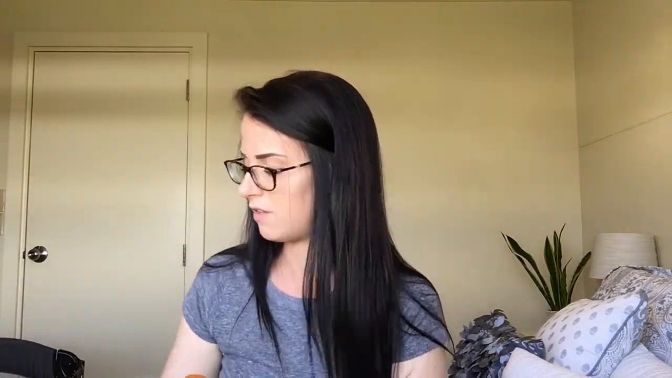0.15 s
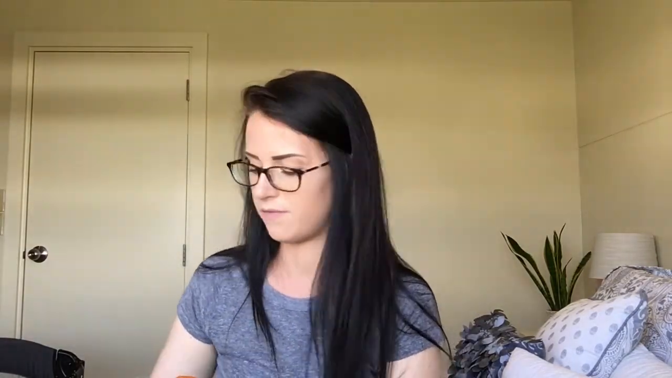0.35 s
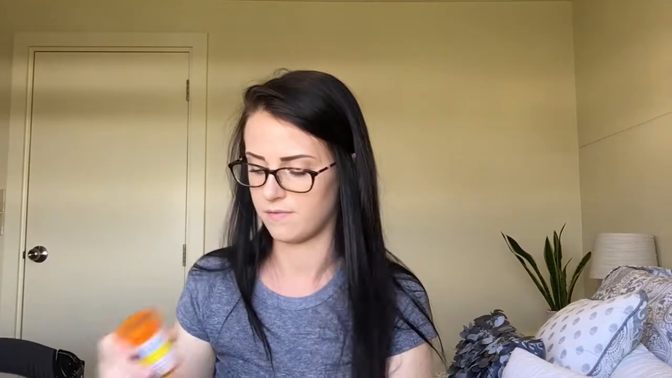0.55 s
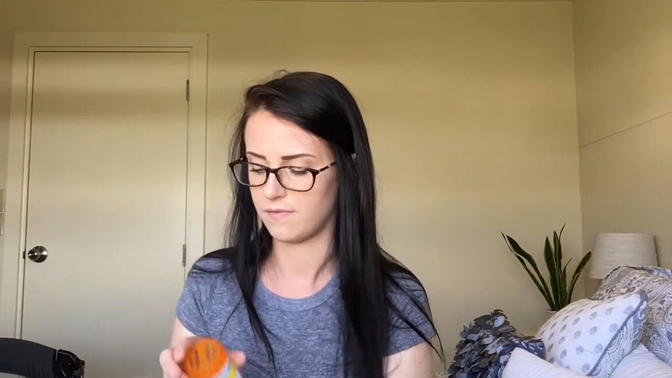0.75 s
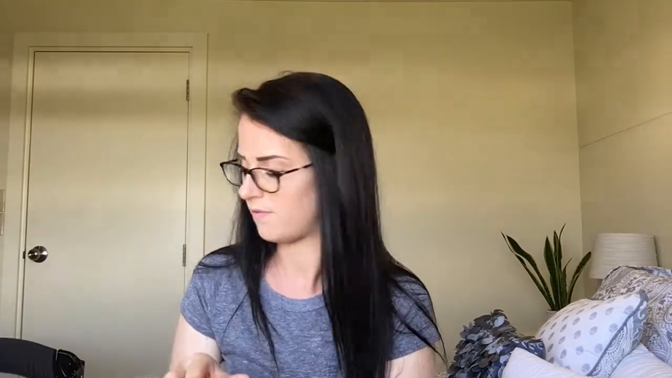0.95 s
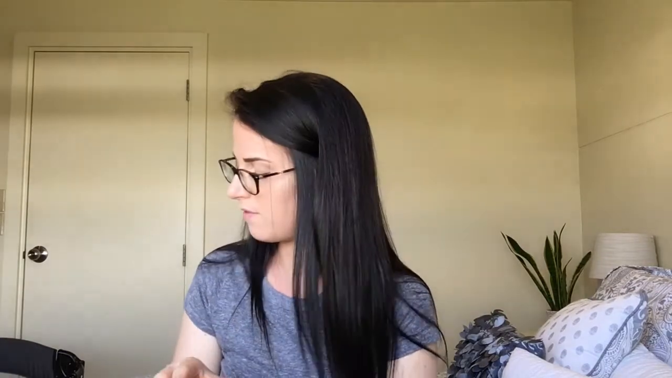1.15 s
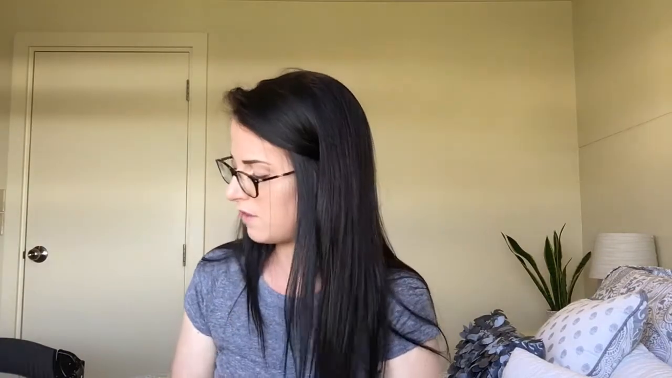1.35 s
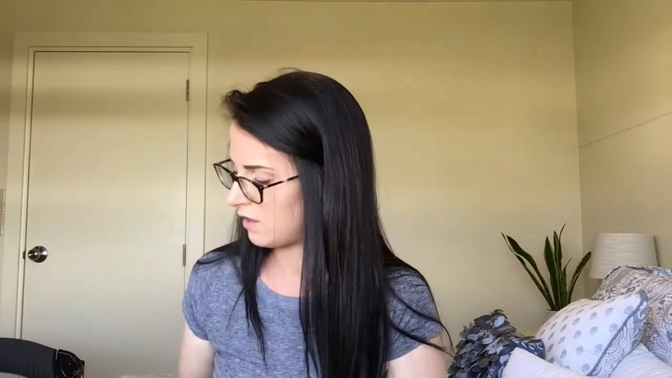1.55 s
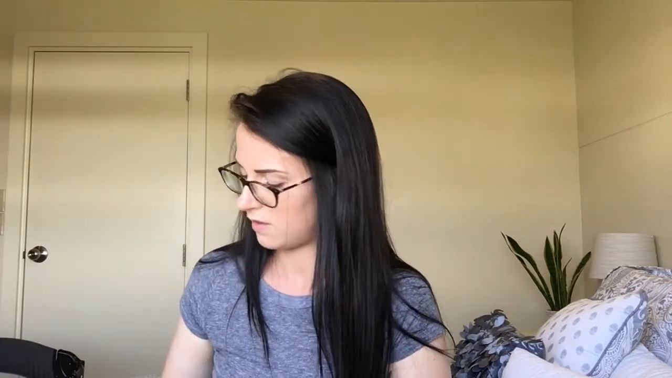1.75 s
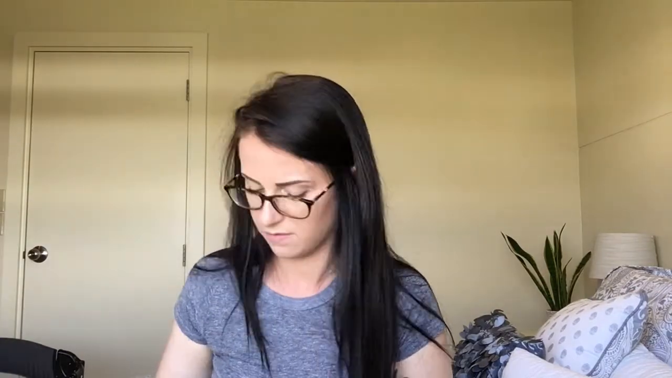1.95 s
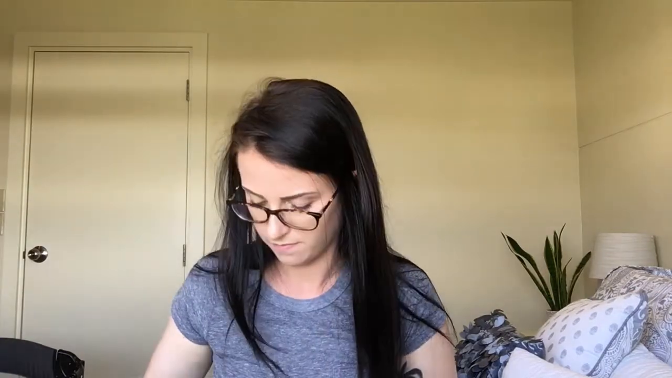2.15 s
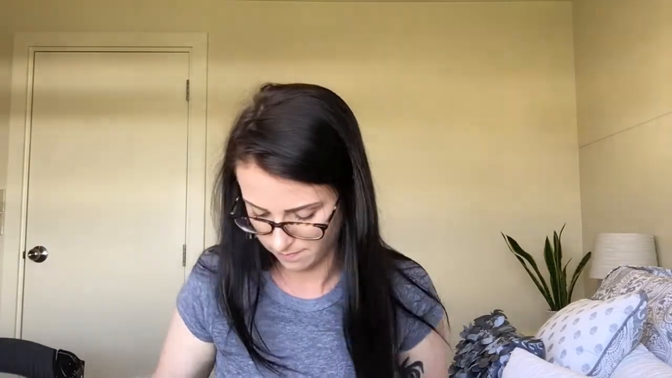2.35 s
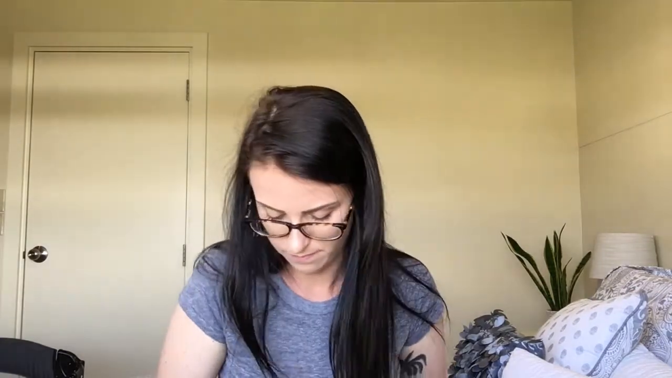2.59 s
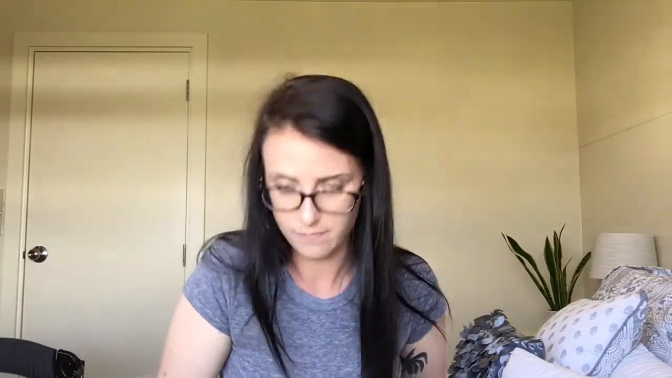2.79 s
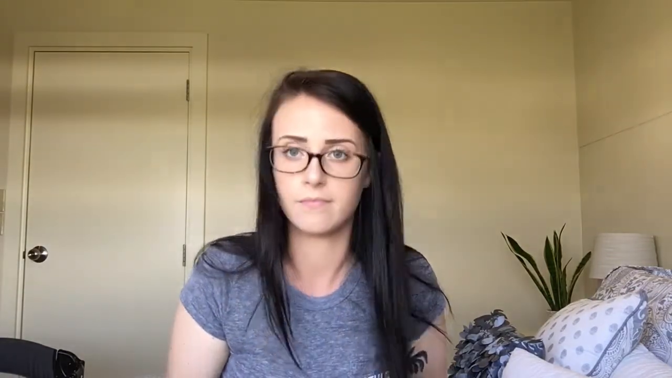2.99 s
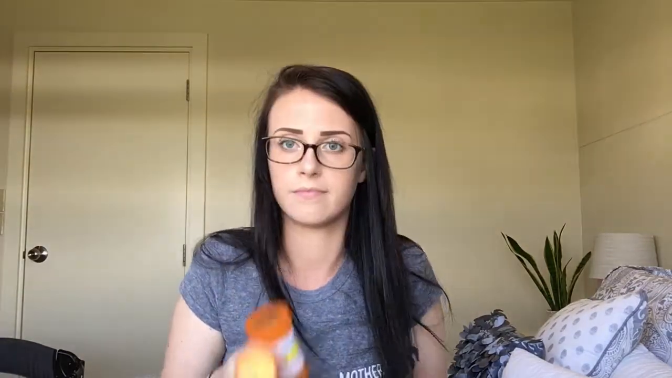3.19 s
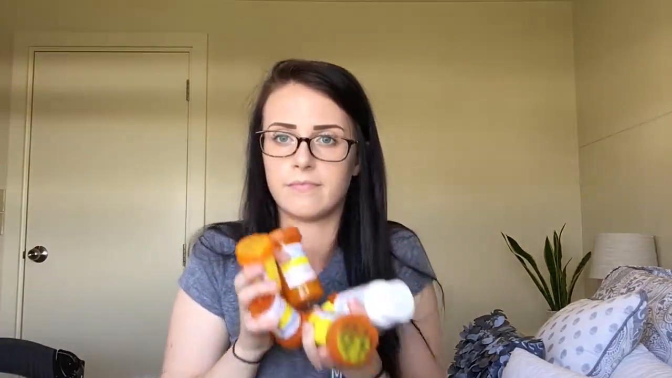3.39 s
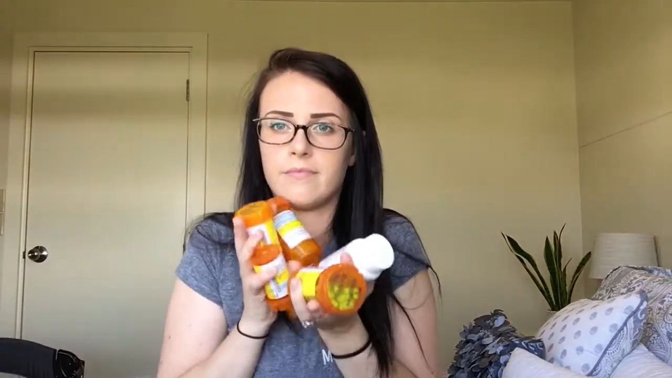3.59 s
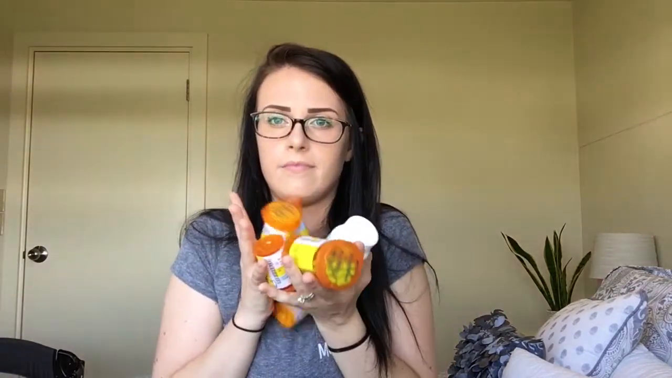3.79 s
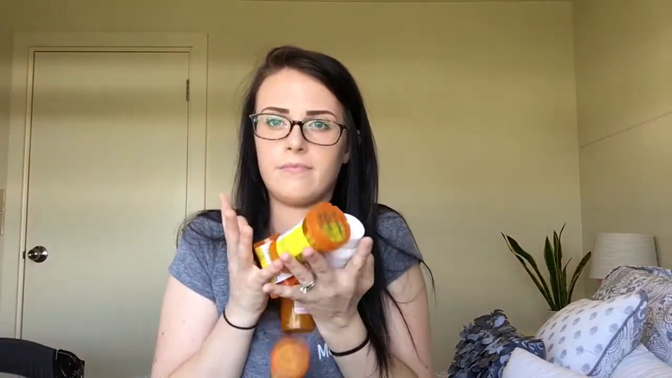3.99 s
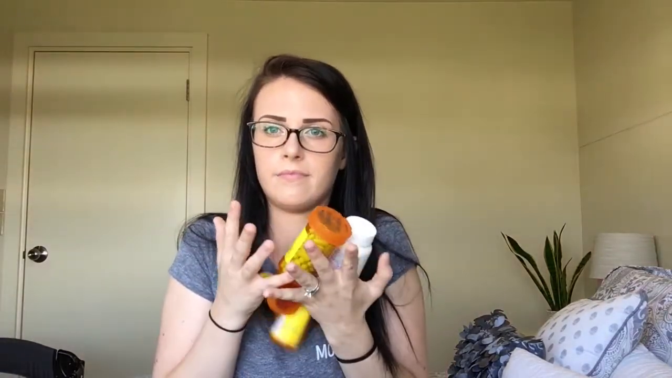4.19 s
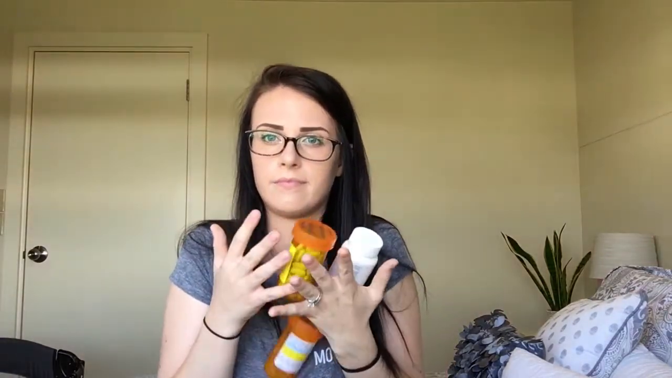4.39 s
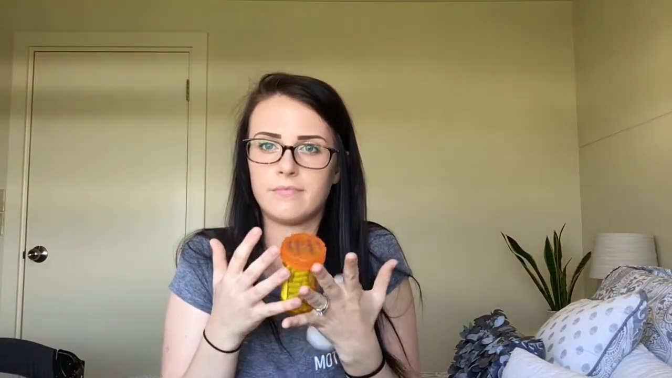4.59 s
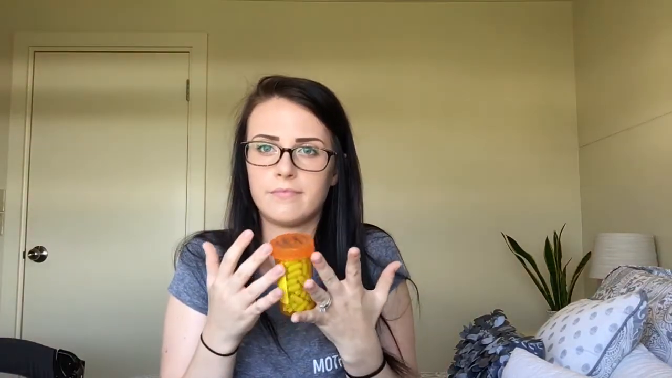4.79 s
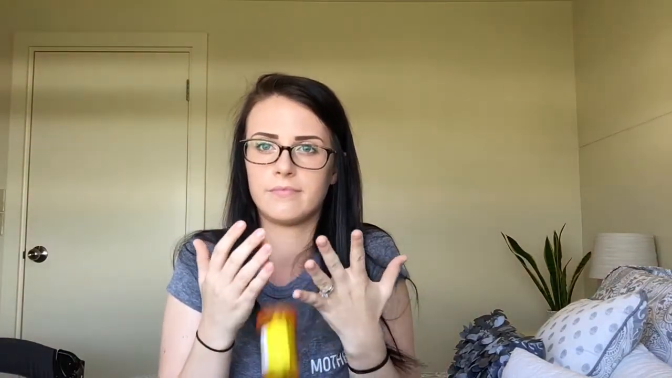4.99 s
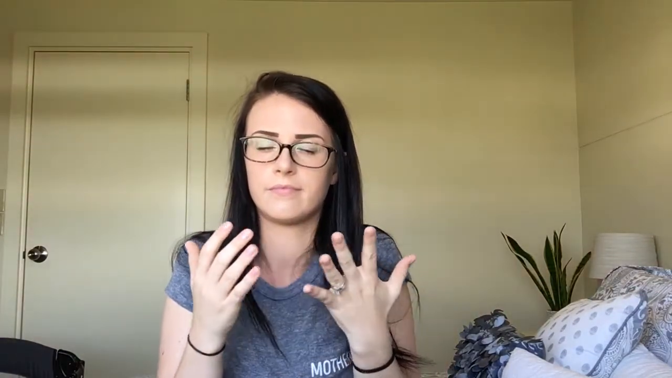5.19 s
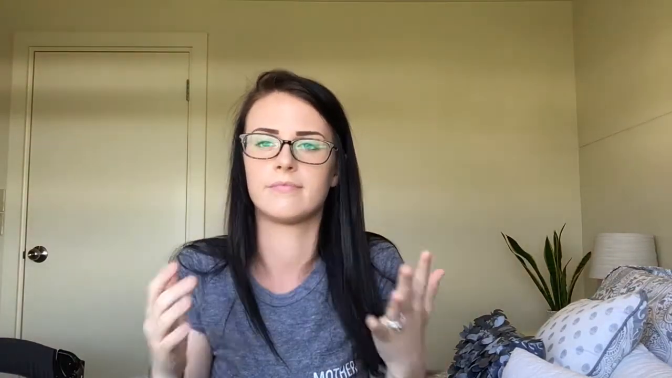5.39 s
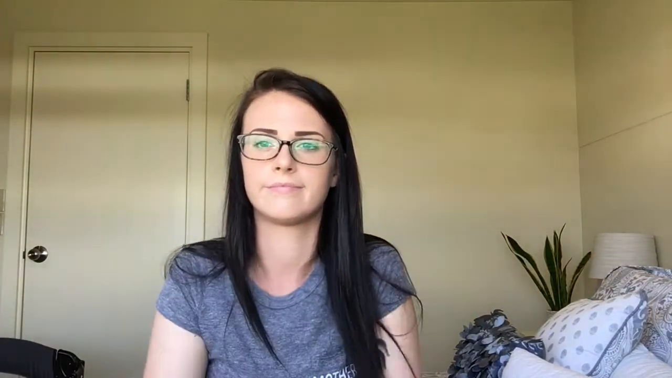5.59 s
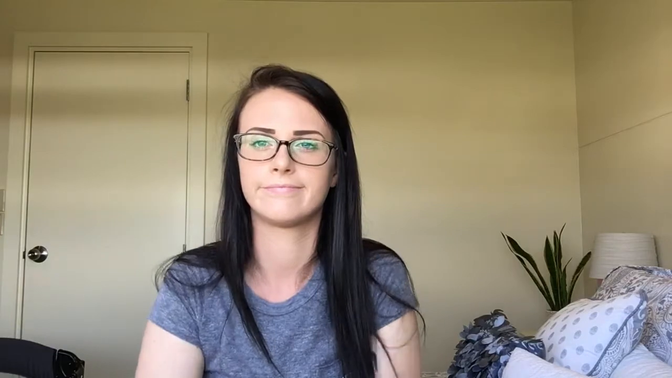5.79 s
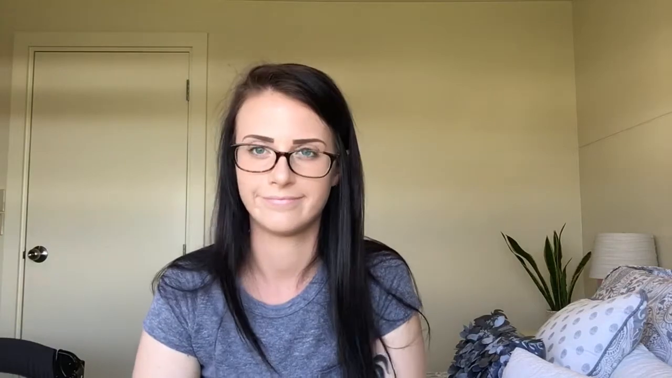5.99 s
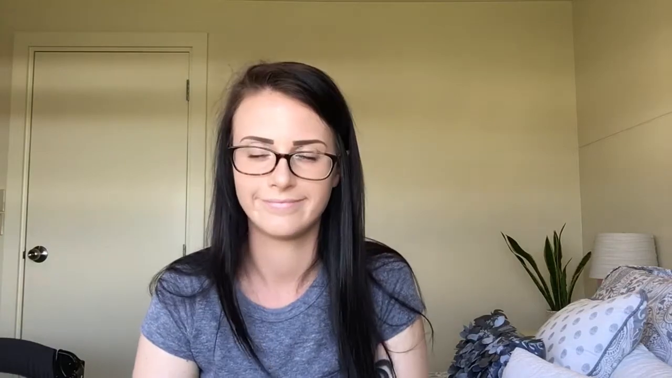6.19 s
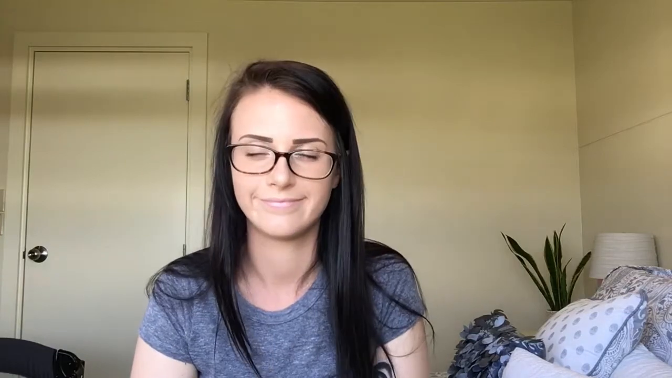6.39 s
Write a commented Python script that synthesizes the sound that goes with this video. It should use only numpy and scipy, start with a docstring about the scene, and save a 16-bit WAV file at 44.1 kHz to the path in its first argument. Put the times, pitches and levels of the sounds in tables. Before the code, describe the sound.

A small, quiet room with faint air noise and a weak low hum, heard fairly close. From 0.3 s, pill-filled plastic bottles are picked up: a light tick and soft bump, faint rubbing, then a small rattle near 0.9 s. Brisker dry rattles come at 1.2-1.3, 1.5-1.8 and, strongest of this group, around 2.0 s, with lesser ones at 2.4 and 2.6 s. It thins to almost nothing around 3 s. From 3.3 s several bottles are lifted and jostled with light clicks and rubbing. At 4.0 s they begin to fall: hollow knocks and pill bursts at 4.0, 4.3-4.4 and 4.55 s, a hard clack at 4.75 s, then the loudest sharp crack and clatter from 4.97 to 5.25 s. The pile settles quickly by 5.5 s. At about 5.8 s a soft low thud lands with a plastic knock and brief rattle, then a tiny tick and quiet.

```python
"""Pills clatter inside plastic bottles: each jolt is random contacts on ringing walls, their force rising and fading.
Caps and walls knock together as single hard blows, the hardest as the bottles fall on the pile.
The bottles are gathered from a table, jostled in two hands and let fall: gated ticking and rubbing.
Falling bottles and, at the end, the dropping hands land with soft thuds of low swings and dull noise.
A small quiet room adds dense reflections, under them filtered noise and a faint wavering hum."""
import sys
import numpy as np
from scipy import signal
from scipy.fft import rfft, irfft
from scipy.io import wavfile

SR = 44100
rng = np.random.default_rng(int(sys.argv[2]) if len(sys.argv) > 2 else 0)


def wrap_up_sound(samples):
    """Save the sound to the file named by the first command line argument, as 16-bit audio."""
    columns = np.atleast_2d(samples).T
    # keep every value between -1 and 1, then stretch to whole-number steps
    tamed = np.clip(columns, -1, 1)
    steps = np.round(tamed * 32767).astype(np.int16)
    wavfile.write(sys.argv[1], SR, steps)


N = 284400
TAPS = 4096
HZ = np.fft.rfftfreq(TAPS, 1 / SR)

# where a bottle is hit: name: (hollow ring [Hz], strength of that ring [dB])
HIT_SPOTS = {"palm": (757, 12), "large": (1158, 17.4), "pile": (1240, 7.63), "base": (1596, 19),
             "neck": (1800, 21), "wall": (1820, 7.3), "small": (2210, 7.5), "cap": (2660, 10.4),
             "lid": (2440, 19.6), "rim": (3600, 10), "edge": (5600, 4)}
# jolts of one bottle:
# (time [s], swell [s], fall [s], level at the crest [dB], brightness [dB per octave], spot)
JOLTS = [(0.279, 0.047, 0.11, -39.5, 3.5, "edge"), (0.375, .003, 0.031, -29.5, 3.5, "cap"),
         (0.838, 0.019, 0.008, -33.5, 0, "palm"), (0.913, 0.0012, 0.018, -31, -0.5, "small"),
         (1.214, 0.0026, 0.0093, -26, -4, "large"), (1.249, .022, 0.077, -33, -3.5, "large"),
         (1.313, 0.0053, 0.013, -23.5, -4, "pile"), (1.434, 0.044, 0.0054, -42.5, -5, "wall"),
         (1.527, 0.011, 0.021, -21, .3, "edge"), (1.656, 0.012, 0.022, -30.5, -1, "small"),
         (1.723, .038, 0.019, -27, 2, "small"), (1.802, 0.0034, 0.0091, -21, 0, "edge"),
         (2.006, 0.012, 0.013, -20, -2, "neck"), (2.043, 0.011, 0.017, -23, -2, "wall"),
         (2.399, 0.0036, 0.0047, -31, -3, "palm"), (2.581, .005, 0.011, -22, -1.5, "cap"),
         (2.602, 0.0067, 0.009, -24.5, -3.5, "cap"), (2.774, 0.0078, 0.018, -37, -3.5, "small"),
         (2.842, 0.0021, 0.02, -37.5, -4, "wall"), (3.356, 0.018, 0.0079, -32, -1.5, "rim"),
         (3.85, 0.027, 0.014, -29.5, -2.5, "wall"), (3.925, 0.018, 0.013, -23, -4, "edge"),
         (4.002, 0.0068, 0.037, -23.5, -4, "pile"), (4.281, .01, 0.008, -17.5, 3.5, "small"),
         (4.551, 0.012, 0.0076, -16, -1, "pile"), (4.657, .002, 0.026, -24, 0, "cap"),
         (4.738, 0.028, 0.011, -14, -3.5, "large"), (4.787, 0.01, 0.017, -30, 0.5, "large"),
         (4.969, .011, 0.0031, -9, -1.1, "wall"), (5.017, 0.0073, 0.012, -15.5, 0, "pile"),
         (5.12, 0.0086, 0.038, -29, -7, "large"), (5.176, 0.032, 0.014, -9, -1.8, "pile"),
         (5.218, 0.0028, 0.02, -11.5, -2.5, "wall"), (5.326, 0.012, 0.057, -30.5, -4, "rim"),
         (5.786, 0.028, 0.013, -30.5, -0.2, "pile")]


def rattles(spread_db=6.0, start_gain=0.41, end_db=-7, settle_s=0.051, detune_octaves=0.06,
            hardness_db_per_octave=1.0, pills=12, contacts_per_s=140):
    """A jolt throws the pills against the wall: contacts grow stronger to a crest, then weaken and settle."""
    out = np.zeros(N)
    t = np.arange(SR // 5) / SR
    for time_s, swell_s, fall_s, level_db, bright, spot in JOLTS:
        hollow_hz, hollow_db = HIT_SPOTS[spot]
        after_s = np.maximum(t - swell_s, 0)
        force = np.interp(t, [0, swell_s], [start_gain, 1])
        force *= amp(end_db * after_s / fall_s)
        force *= np.exp(-np.maximum(after_s - fall_s, 0) / settle_s)
        clatter = 0
        # each pill has its own place on the wall and lands flat (dull) or on edge (bright)
        for place, edge in rng.uniform(-1, 1, (pills, 2)):
            pill_hollow_hz = hollow_hz * 2 ** (detune_octaves * place)
            colour_db = bottle_colour(pill_hollow_hz, hollow_db, bright + hardness_db_per_octave * edge)
            hits = force * contacts(len(t), contacts_per_s, spread_db)
            clatter = clatter + signal.fftconvolve(hits, blow(colour_db))
        add(out, time_s, amp(level_db) * np.linalg.norm(force) * unit(clatter))
    return out


def contacts(length, per_s, spread_db):
    """Random contacts of uneven strength and either sign, with a mean power of one."""
    size = amp(spread_db * np.clip(rng.standard_normal(length), -2, 2))
    size *= rng.choice([-1, 1], length)
    happens = rng.random(length) < per_s / SR
    return unit(size * happens) * np.sqrt(length)


def blow(colour_db, scatter=2.42, scatter_s=0.0013):
    """A sharp tick, then a millisecond of waves crossing the bottle, drawn once per pill, knock or tick pitch."""
    t = np.arange(SR // 100) / SR
    waves = scatter * unit(rng.standard_normal(len(t)) * np.exp(-t / scatter_s))
    waves[0] += 1
    return unit(signal.fftconvolve(ring(colour_db), waves))


# colour of a blow on thin hard plastic: (frequency [Hz], level [dB])
PLASTIC_COLOUR = [(40, -49.5), (120, -42), (250, -17.5), (500, -11), (850, -7.5), (1500, -4), (2500, -1),
                  (4200, -4.5), (5000, -6), (6000, -4.5), (8500, -10), (10300, -16.5), (12500, -17.5),
                  (16000, -25.5)]
# modes of the bottle walls and the air inside: (frequency [Hz], width [Hz], boost [dB])
BOTTLE_MODES = [(866, 330, 3), (1293, 12, 4.5), (1448, 52, 6.5), (1595, 70, 4.5), (2010, 110, 2.5),
                (4026, 930, 4.5)]


def bottle_colour(hollow_hz, hollow_db, bright_db_per_octave, width_octaves=0.3):
    """Colour of one bottle in dB: plastic, wall modes, and a broad hollow ring set by size, fill and grip."""
    distance_octaves = abs(np.log2((HZ + 1) / hollow_hz))
    hollow = hollow_db / (1 + (distance_octaves / width_octaves) ** 3)
    modes = sum(db / (1 + (2 * (HZ - hz) / width_hz) ** 2) for hz, width_hz, db in BOTTLE_MODES)
    tilt = bright_db_per_octave * np.log2(np.maximum(HZ, 500) / 2000)
    return read(PLASTIC_COLOUR, HZ) + hollow + modes + tilt


def ring(colour_db):
    """Minimum-phase response of a colour: a sharp start, then ringing at its peaks."""
    both_sides_db = np.concatenate([colour_db, colour_db[-2:0:-1]])
    log_gain = np.log(amp(both_sides_db))
    spectrum = np.exp(np.conj(signal.hilbert(log_gain)))
    return unit(np.fft.ifft(spectrum).real)


# single knocks: (time [s], level [dB], brightness [dB per octave], spot)
SINGLE_KNOCKS = [(0.0214, -40.5, -9, "lid"), (0.4179, -31.5, 3, "lid"), (0.525, -43.5, 5, "edge"),
                 (0.7359, -34.5, 2.5, "rim"), (0.9137, -28.5, -3, "small"), (1.465, -38, -3, "rim"),
                 (1.935, -36.5, 0, "small"), (1.9712, -32.5, -5.5, "large"), (1.9977, -25, 1.5, "base"),
                 (2.0124, -18.5, 0.5, "wall"), (2.1212, -29.5, -2.5, "palm"), (2.193, -30.5, -5.5, "rim"),
                 (2.3138, -30.5, -4.5, "lid"), (2.34, -38, -8, "pile"), (2.7042, -34, -7, "pile"),
                 (3.0316, -40, -2, "cap"), (3.113, -40.5, 2.5, "wall"), (3.3143, -35.5, -1, "rim"),
                 (3.329, -34, -4, "cap"), (3.3776, -27, -.8, "rim"), (3.412, -36, 3, "rim"),
                 (3.4394, -31, 0, "rim"), (3.483, -38, 0, "wall"), (3.5213, -25, -1.5, "wall"),
                 (3.578, -27, -2, "cap"), (4.0196, -15.5, -8, "base"), (4.0706, -27.5, -15, "palm"),
                 (4.1315, -23, -10, "lid"), (4.1564, -21.5, -1, "neck"), (4.2108, -22, -20, "palm"),
                 (4.236, -21, -0.5, "cap"), (4.2555, -22, -3, "small"), (4.3741, -13.5, 3, "base"),
                 (4.3815, -17.5, 3, "base"), (4.5072, -20, -0.5, "palm"), (4.731, -19, -4, "wall"),
                 (4.7491, -7, -3, "pile"), (4.9678, -11, -1.5, "wall"), (4.978, -5, -1, "edge"),
                 (5.1192, -26, -3.5, "rim"), (5.1472, -25, 2, "rim"), (5.491, -34, -5.5, "small"),
                 (5.521, -34.5, -4, "small"), (5.8, -23, -3, "base"), (5.962, -36.5, -1.5, "small")]


def knocks(lead_db=-4.5, lead_db_per_swell_s=-200, lead_bright_db_per_octave=0.5):
    """Caps and walls knock on their own and as each jolt starts, the weaker the slower its swell."""
    out = np.zeros(N)
    for time_s, level_db, bright, spot in SINGLE_KNOCKS:
        add(out, time_s, knock(level_db, bright, spot))
    for time_s, swell_s, _, level_db, bright, spot in JOLTS:
        first_db = level_db + lead_db + lead_db_per_swell_s * swell_s
        add(out, time_s, knock(first_db, bright + lead_bright_db_per_octave, spot))
    return out


def knock(level_db, bright, spot, blow_s=0.0027, scatter=0.98, chatter=0.5, chatter_s=0.01):
    """One hard contact with a brief chatter of the loose cap and pills."""
    t = np.arange(SR // 25) / SR
    push = chatter * unit(rng.standard_normal(len(t)) * np.exp(-t / chatter_s))
    push[0] += 1
    colour_db = bottle_colour(*HIT_SPOTS[spot], bright)
    sound = unit(signal.fftconvolve(push, blow(colour_db, scatter=scatter)))
    return amp(level_db) * np.sqrt(blow_s * SR) * sound


def shuffle(per_s=24, spread_db=4, hollow_db=14, bright=-1, hardness_db_per_octave=5.4, count=18):
    """Bottles tick together, large hollow ones dull and small caps bright, while labels and fingers rub."""
    ticks = 0
    for hollow_hz in np.geomspace(780, 4300, count):
        tick_bright = bright + hardness_db_per_octave * np.log2(hollow_hz / 2000)
        tick = blow(bottle_colour(hollow_hz, hollow_db, tick_bright))
        ticks = ticks + signal.oaconvolve(contacts(N, per_s, spread_db), tick)[:N]
    ticks = ticks / np.sqrt(count)
    rub = signal.oaconvolve(contacts(N, 1800, 9.8), ring(bottle_colour(3700, 2, 1.0)))[:N]
    ticking, rubbing = handling()
    return ticking * ticks + rubbing * rub


# a hand grips and shifts a bottle: (time [s], length [s], ticking level [dB], rubbing level [dB])
HAND_GRIPS = [(0.28, 0.074, -48, -52), (0.666, 0.25, -57.5, -47.5), (1.096, 0.12, -56.5, -64.5),
              (1.236, 0.32, -45.5, -71), (1.62, 0.17, -51.5, -56), (2.0, .2, -46.5, -59),
              (2.333, 0.13, -46, -56), (2.625, 0.27, -54, -71), (3.084, 0.23, -56, -69),
              (3.687, 0.078, -47, -45), (4.885, 0.022, -36, -32), (5.812, 0.053, -49.5, -57)]
# jostling of the whole heap, from lifting it until it lies still: (time [s], level [dB])
HEAP_JOSTLE = [(3.3, -65), (3.39, -42.5), (3.6, -48.5), (3.83, -54), (3.9, -40.5), (4.25, -33), (4.7, -39),
               (4.96, -32.5), (5.1, -40.5), (5.37, -43), (5.56, -67)]


def handling(attack_s=0.0085, release_s=0.057, jostle_rub_db=-7.5):
    """Strength of ticking and rubbing: grips set in, hold and let go; the heap is jostled without a pause."""
    t = np.arange(N) / SR
    ticking = amp(np.interp(t, *np.transpose(HEAP_JOSTLE), left=-np.inf, right=-np.inf))
    rubbing = amp(jostle_rub_db) * ticking
    for time_s, length_s, tick_db, rub_db in HAND_GRIPS:
        grip = np.clip((t - time_s) / attack_s, 0, 1)
        grip *= np.exp(-np.maximum(t - time_s - length_s, 0) / release_s)
        ticking = np.hypot(ticking, amp(tick_db) * grip)
        rubbing = np.hypot(rubbing, amp(rub_db) * grip)
    return ticking, rubbing


# soft landings: (time [s], thump level [dB], level of the low boom under it [dB])
LANDINGS = [(0.276, -53, -48), (4.272, -43.5, -36), (4.74, -43.5, -49.5), (4.972, -54.5, -57),
            (5.21, -57, -51), (5.757, -34.5, -35.5)]


def thuds(slap_lead_s=0.024, slap_db=-9.5, boom_delay_s=0.018):
    """A soft weight lands: a slap and a thump, then a short boom, with no deep rumble."""
    out = np.zeros(N)
    for time_s, thump_db, boom_db in LANDINGS:
        add(out, time_s - slap_lead_s, amp(thump_db + slap_db) * swing(hz=285, fade_s=0.014))
        add(out, time_s, amp(thump_db) * swing(hz=100, fade_s=0.018))
        add(out, time_s + boom_delay_s, amp(boom_db) * swing(hz=54.5, fade_s=0.013))
    return signal.sosfilt(signal.butter(2, 35, "high", fs=SR, output="sos"), out)


def swing(hz, fade_s, puff=0.98):
    """A few low cycles and a dull puff of noise under one swell and fade."""
    t = np.arange(SR // 3) / SR
    band = signal.butter(2, [hz / 2, 3.0 * hz], "band", fs=SR, output="sos")
    dull = signal.sosfilt(band, rng.standard_normal(len(t)))
    envelope = (2 * t / fade_s) * np.exp(1 - 2 * t / fade_s)  # crest of 1 at fade_s / 2
    cycles = np.sqrt(2) * np.sin(2 * np.pi * hz * t)
    return envelope * (cycles + puff * dull / dull.std())


# time to die by 60 dB: (frequency [Hz], time [s])
REVERB_T60 = [(100, 0.57), (500, 0.11), (1500, 0.45), (4000, 0.34), (8000, 0.41), (16000, 0.31)]
# reflected against direct energy: (frequency [Hz], level [dB])
REVERB_SEND = [(100, -8), (500, -3), (1500, -6), (4000, -6), (8000, -12.5), (16000, -10)]


def room(x, build_s=0.0024, first_s=0.001, taps_per_s=4000):
    """Dense reflections from near walls, each band dying at its own speed."""
    taps = rng.choice([-1., 1.], SR) * (rng.random(SR) < taps_per_s / SR)
    hz, t, bands = signal.stft(unit(taps), SR, nperseg=256)
    t60_s = read(REVERB_T60, hz)[:, None]
    send_db = read(REVERB_SEND, hz)[:, None]
    # the root keeps the energy of a band independent of its decay time
    bands = bands * amp(send_db - 60 * t / t60_s) * np.sqrt(2 * np.log(1000) / t60_s)
    tail = signal.istft(bands, SR, nperseg=256)[1][:SR]
    tail *= np.clip((np.arange(SR) / SR - first_s) / build_s, 0, 1)
    return x + signal.fftconvolve(x, tail)[:N]


# colour of the room air, relative: (frequency [Hz], density [dB per Hz])
AIR_COLOUR = [(15, -40), (25, -27), (49, -6.5), (82, -12), (120, -11), (212, -12), (335, -7.5),
              (416, -17.5), (754, -15), (863, -26), (1070, -21), (16000, -50.5)]
# appliance hum: (frequency [Hz], level [dB])
HUM_TONES = [(58.5, -63.5), (119, -64), (339, -80)]


def air(air_db=-54, waver_rad=0.77):
    """Still room air as filtered noise, with an appliance's faint hum of phase-wavering sines."""
    gain = amp(read(AIR_COLOUR, np.fft.rfftfreq(N, 1 / SR)))
    hiss = irfft(rfft(rng.standard_normal(N)) * gain, N)
    t = np.arange(N) / SR
    hum = 0
    for hz, level_db in HUM_TONES:
        waver = np.interp(t, np.linspace(0, t[-1], 40), rng.standard_normal(40))
        hum = hum + amp(level_db) * np.sqrt(2) * np.sin(2 * np.pi * hz * t + waver_rad * waver)
    return amp(air_db) * hiss / hiss.std() + hum


def amp(db):
    """Decibels to amplitude."""
    return 10 ** (np.asarray(db) / 20)


def unit(x):
    """Scales to an energy of one."""
    return x / np.sqrt(np.sum(x ** 2) + 1e-20)


def read(points, hz):
    """Joins points by straight lines on a log-frequency axis."""
    f, value = np.transpose(points)
    return np.interp(np.log(hz + 1), np.log(f + 1), value)


def add(mix, time_s, sound):
    """Mixes a sound in at its time, cut at the end of the mix."""
    part = mix[max(round(time_s * SR), 0):][:len(sound)]
    part += sound[:len(part)]


def scene():
    """All bottle and hand sounds reflect in the room; the air lies under them."""
    bottles = rattles() + knocks() + shuffle()
    return (room(bottles + thuds()) + air())[None]


def record(dry, ceiling=0.74, edge_hz=16100):
    """The loudest peaks are rounded off; then a low-pass limits the band."""
    rounded = dry / (1 + (dry / ceiling) ** 4) ** (1 / 4)
    lowpass = signal.firwin(401, edge_hz, window=("kaiser", 8), fs=SR)
    return signal.oaconvolve(rounded, lowpass[None], "same")


dry = scene()
out = record(dry)
wrap_up_sound(out)
```